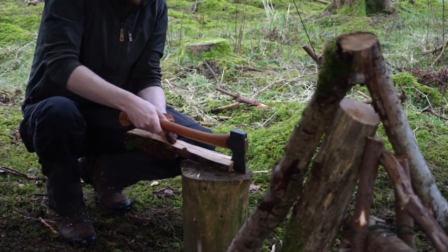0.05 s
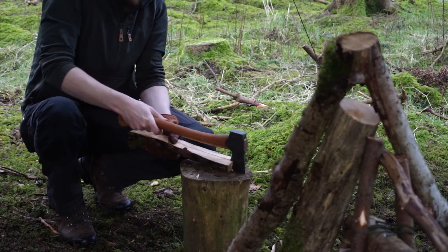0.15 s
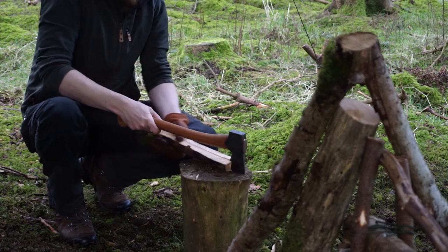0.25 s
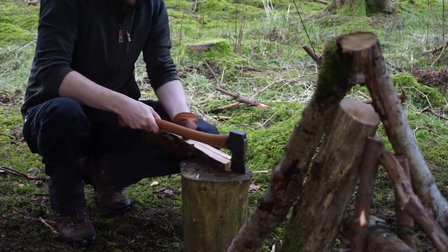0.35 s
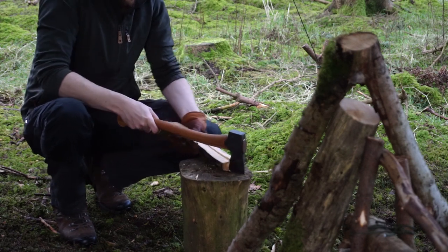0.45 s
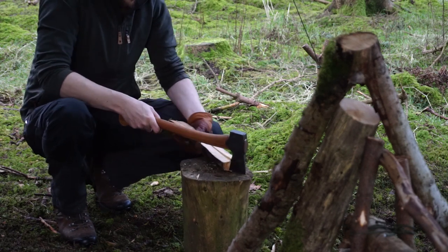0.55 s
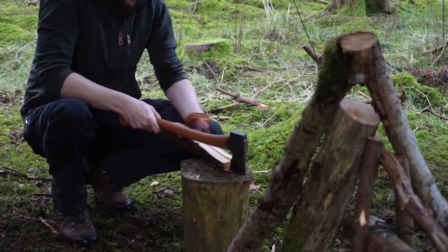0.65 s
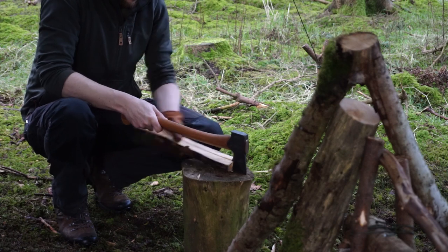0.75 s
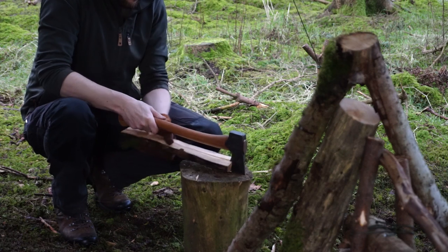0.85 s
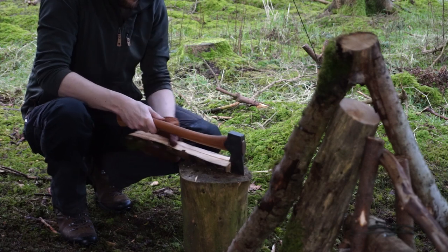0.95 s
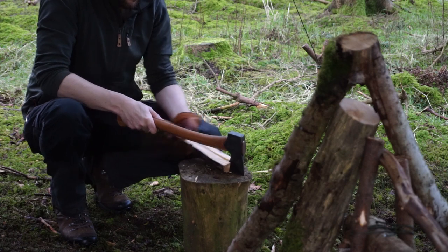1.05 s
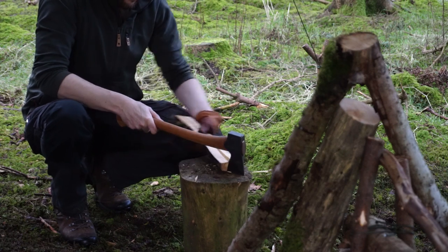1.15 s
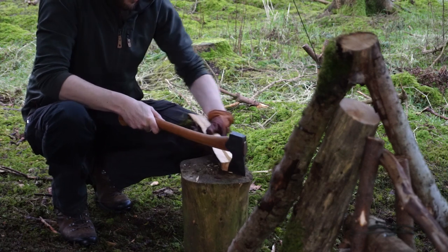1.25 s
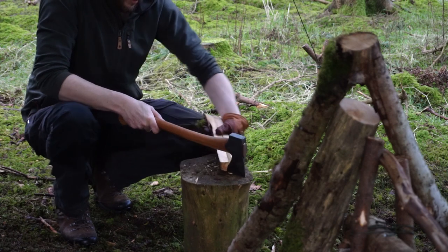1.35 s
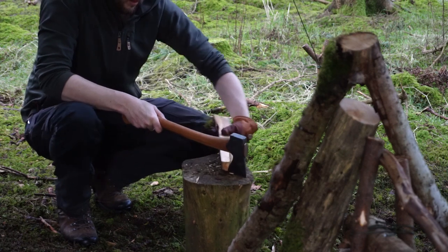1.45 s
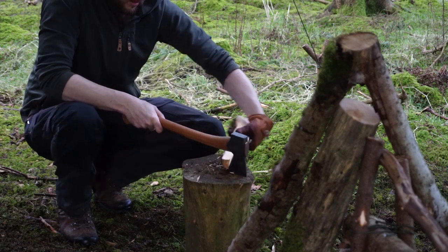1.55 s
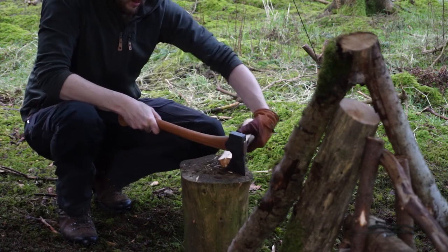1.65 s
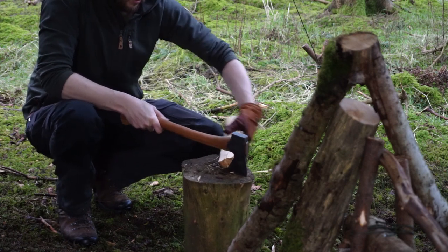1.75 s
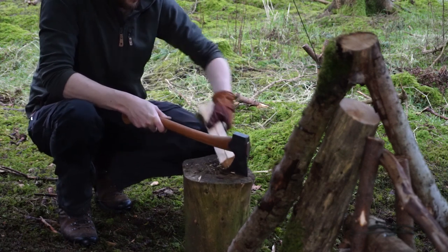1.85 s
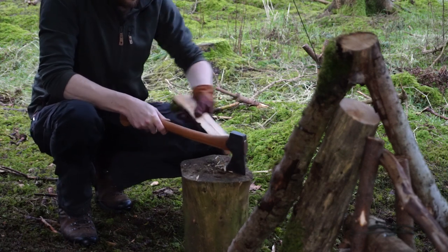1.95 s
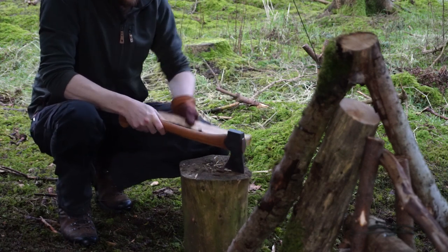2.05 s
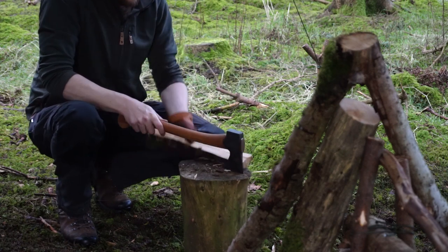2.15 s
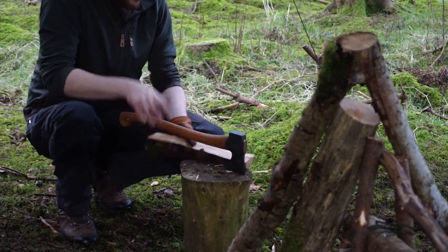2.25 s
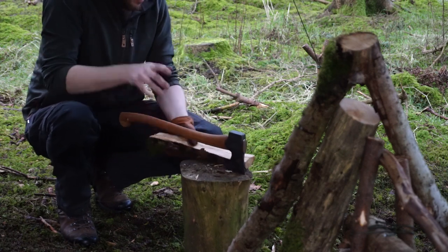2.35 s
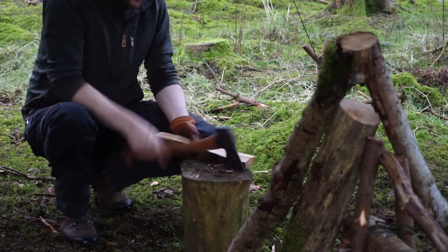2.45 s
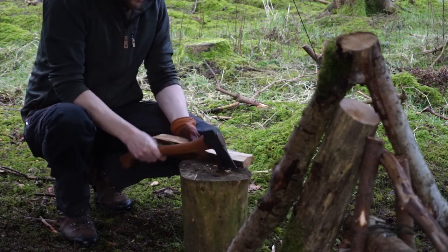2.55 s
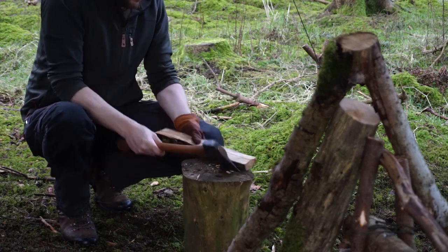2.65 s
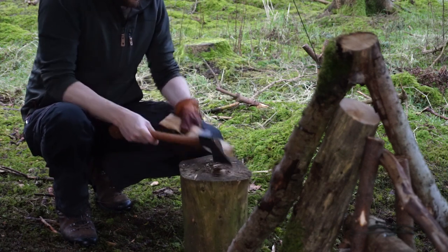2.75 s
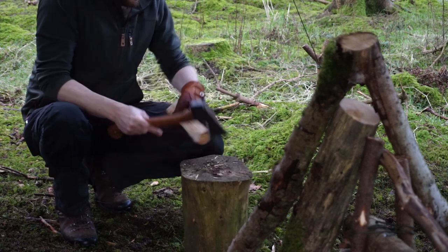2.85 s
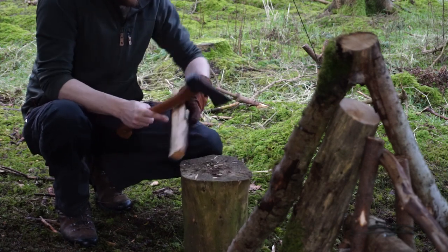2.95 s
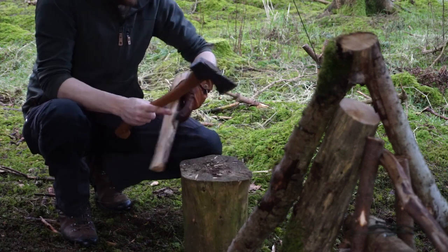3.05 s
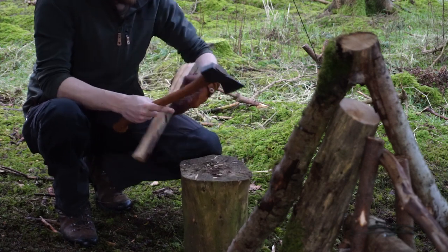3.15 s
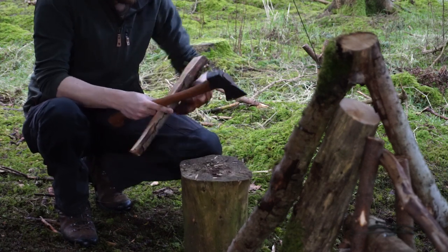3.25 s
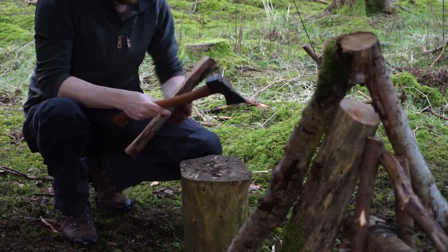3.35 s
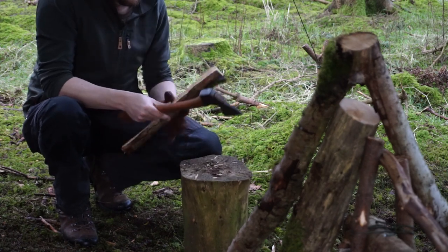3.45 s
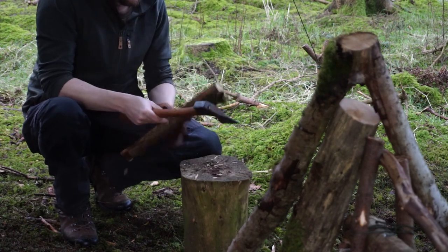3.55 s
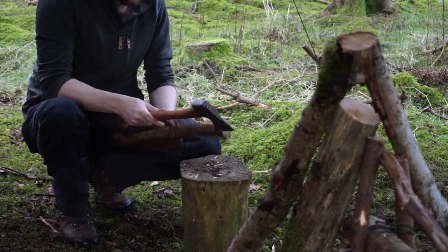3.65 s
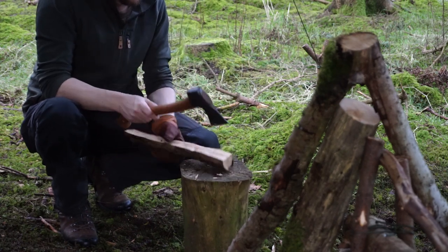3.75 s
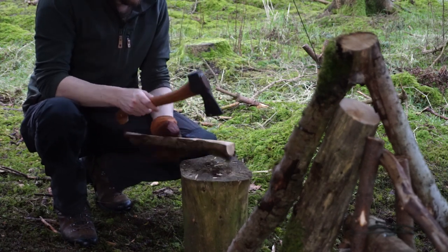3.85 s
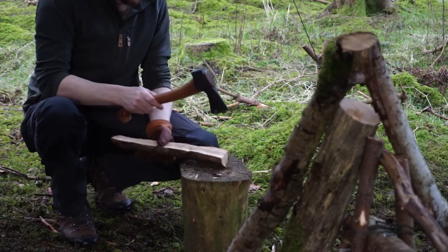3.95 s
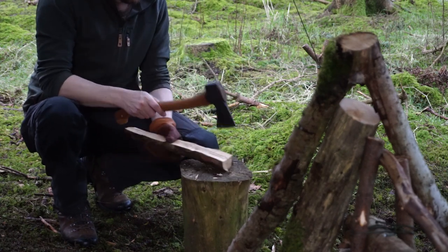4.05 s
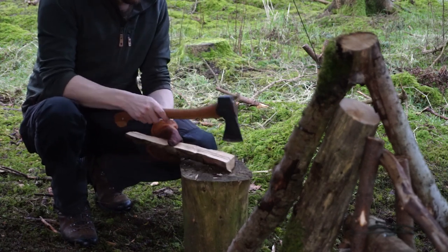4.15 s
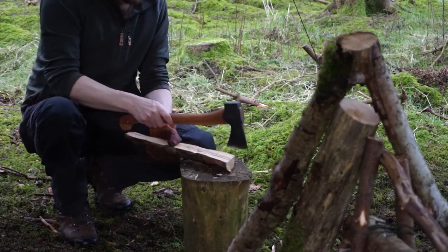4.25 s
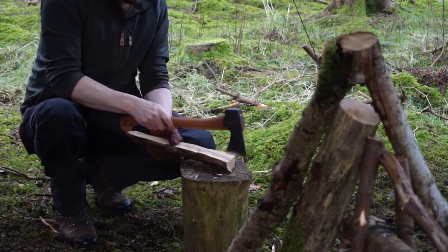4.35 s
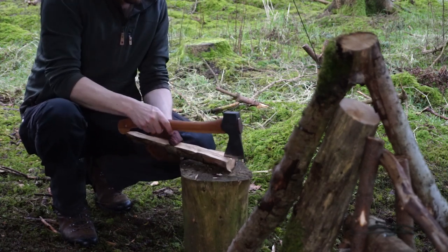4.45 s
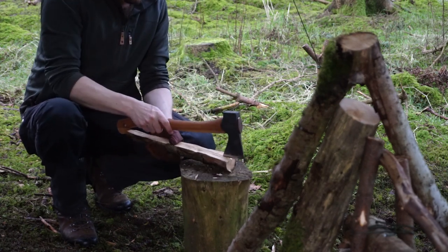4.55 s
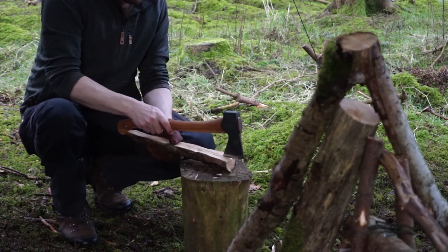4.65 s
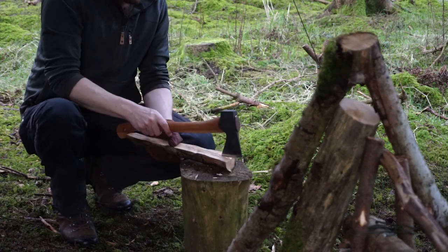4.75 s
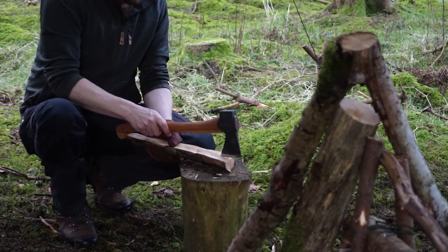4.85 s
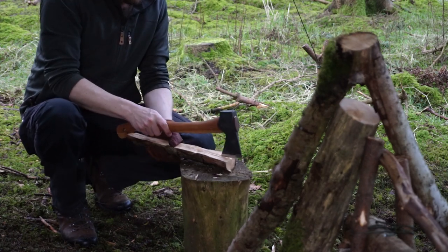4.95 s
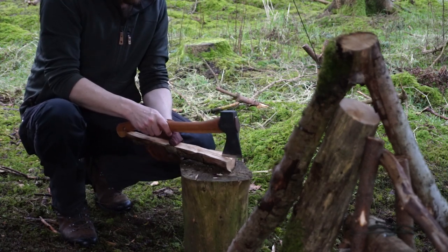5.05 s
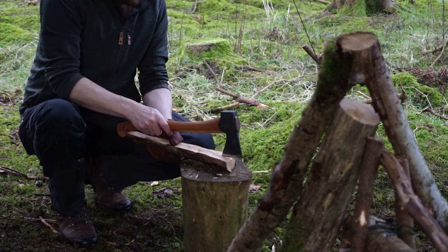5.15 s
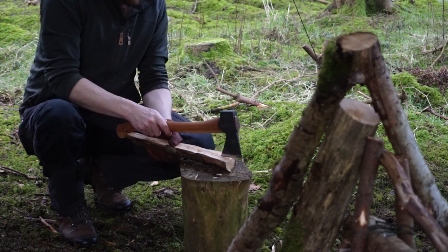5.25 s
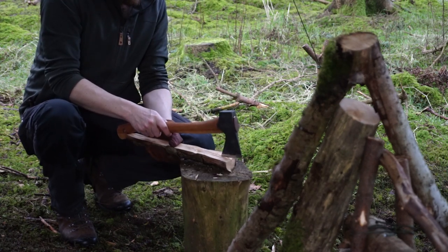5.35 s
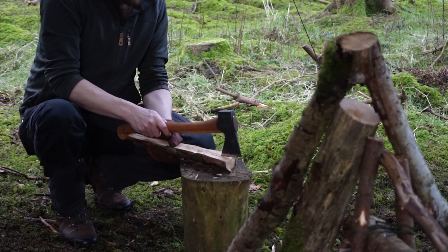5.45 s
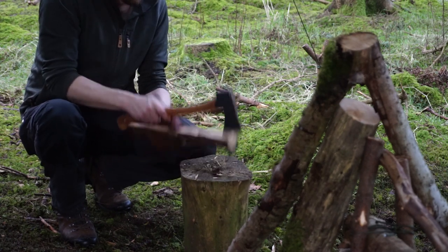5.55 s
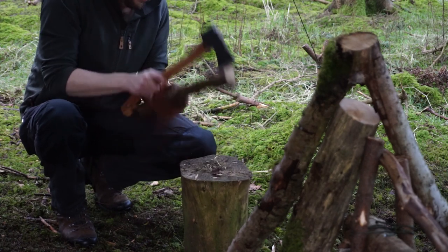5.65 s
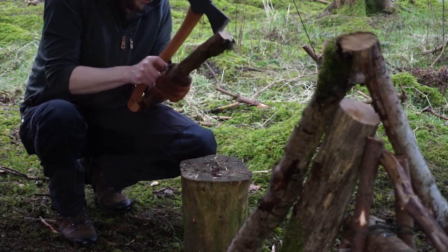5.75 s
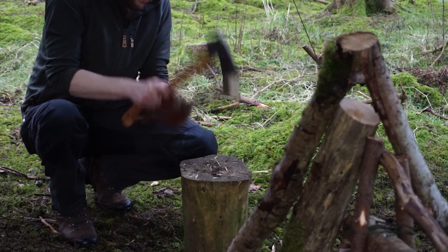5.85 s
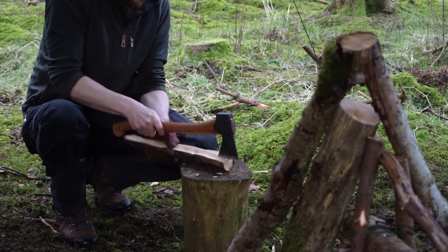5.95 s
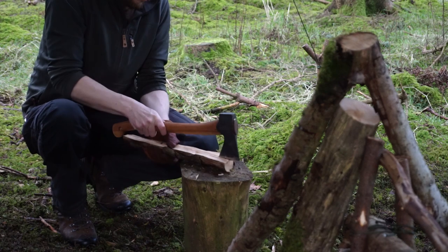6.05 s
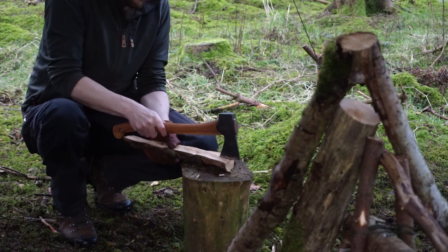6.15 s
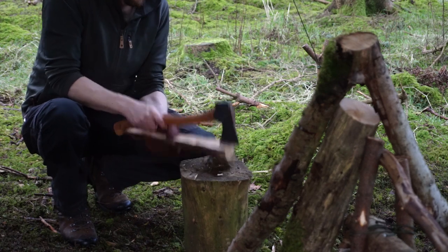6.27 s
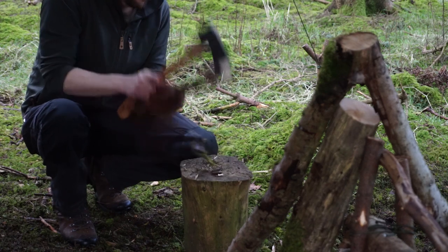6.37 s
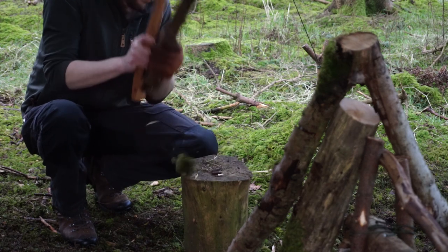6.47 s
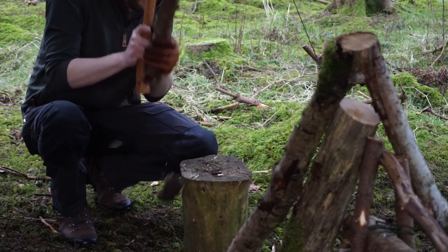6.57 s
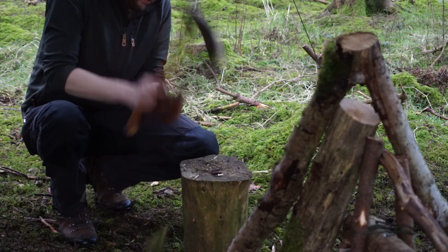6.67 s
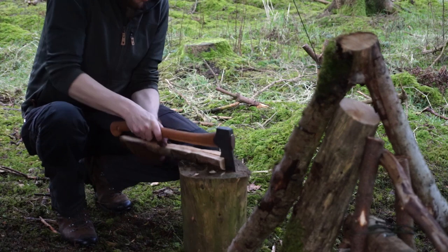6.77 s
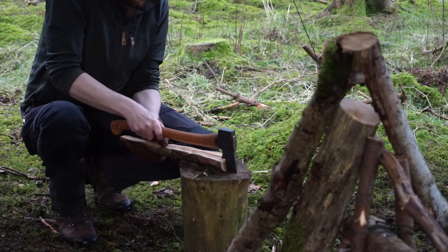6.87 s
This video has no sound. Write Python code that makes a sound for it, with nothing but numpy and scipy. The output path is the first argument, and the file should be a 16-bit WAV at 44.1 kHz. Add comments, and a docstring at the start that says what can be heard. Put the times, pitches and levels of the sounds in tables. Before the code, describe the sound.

Outdoor hatchet work, picked up by a nearby camera with slight hum and hiss. Dry, snapping blows on wood come first, with small fibre crackles and a bird's quick trill fading away. Handling knocks, tiny splinter ticks and cloth rustle fill the middle, with thin sliding bird whistles. Finally two louder, fuller chops crack and thump, their short diffuse echoes dying among the trees.

```python
"""Sharp cracks ring through mossy woodland as a hatchet splits a short billet on a chopping block.
Each blow drives damped modes of wood and hatchet with a push and tearing fibres; noise echoes from the trunks.
Clicks make splinter ticks and a ground thud, grainy noise makes rubbing sleeves, and gliding sines
make small birds. Under them lie a soft wash of shaped noise and the camera's faint hum and hiss."""
import sys
import numpy as np
from scipy import signal
from scipy.fft import rfft, irfft
from scipy.io import wavfile
from scipy.ndimage import uniform_filter1d

SR = 44100
rng = np.random.default_rng(int(sys.argv[2]) if len(sys.argv) > 2 else 0)


def master(y):
    """Save y as 16-bit WAV."""
    cut = np.clip(np.atleast_2d(y).T, -1, 1)
    pcm = np.round(cut * 32767)  # scale
    wavfile.write(sys.argv[1], SR, pcm.astype(np.int16))


N = 304713

# Borders of the registers thud, knock, clack, rap, crack and snap, low to high, in Hz.
REGISTER_EDGES = [175, 420, 880, 2000, 2850, 4200, 15000]


def amp(db):
    """Turns decibels into gain."""
    return 10 ** (np.asarray(db) / 20)


def unit(x):
    """Scales to rms 1."""
    return x / np.sqrt(np.mean(x ** 2) + 1e-20)


def packet(x):
    """Scales to energy 1."""
    return x / np.sqrt(np.sum(x ** 2) + 1e-20)


def add(mix, s, sound):
    """Mixes a sound in at a time in seconds."""
    part = mix[max(round(s * SR), 0):][:len(sound)]
    part += sound[:len(part)]


def band(x, lo, hi, order=2):
    """Causal band-pass between two frequencies in Hz."""
    sos = signal.butter(order, [lo, min(hi, .49 * SR)], "band", fs=SR, output="sos")
    return signal.sosfilt(sos, x)


def coloured(x, points):
    """Gives a noise the spectrum drawn through points (Hz, dB), at rms 1."""
    hz, db = np.transpose(points)
    shape = np.interp(np.log(np.fft.rfftfreq(len(x), 1 / SR) + 1), np.log(hz), db)
    return unit(irfft(rfft(x) * amp(shape), len(x)))


def chopping():
    """Splits, duller knocks and faint cracks, with a slap from one near trunk and the forest's tail."""
    # The billet splits. Each row: start in seconds, knock of the wood in dB, centre of the knock in Hz,
    # crack of the fibres in dB, ring of the hatchet in dB, tearing time in seconds,
    # factor on the wood's pitch, factor on its ringing time, send to the forest echo in dB.
    splits = [(.364, -49, 1700, -31, -48, 0.0024, 0.98, 0.55, -13),
              (0.4995, -21, 930, -28, -21.5, 0.0023, 1.095, 1.24, -17),
              (1.273, -29.5, 1320, -31, -19.5, 0.0024, 0.99, 0.5, -24.5),
              (1.6487, -37.5, 1060, -43, -40.5, 0.0087, 1, 0.82, -38),
              (5.999, -11.5, 824, -28, -44, 0.0038, 1.013, 0.42, -27),
              (6.7925, -38, 1300, -44.5, -47.5, 0.0067, 1.25, 0.78, -22),
              (6.813, -15, 1110, -25, -22.5, 0.003, 1.036, 0.41, -13.5)]
    # Duller knocks: billet and hatchet bumping on the block, and the low thuds within the blows.
    # Each row: start in seconds, knock level in dB, centre of the knock in Hz, factor on the wood's pitch.
    knocks = [(1.657, -41, 328, 1.4), (2.5, -28.5, 947, 0.91), (2.5078, -31, 1050, 0.91),
              (2.511, -24.5, 198, .8), (2.8331, -40, 700, 0.92), (3.768, -24.5, 1136, 1.1),
              (3.8071, -36.5, 740, 0.95), (3.824, -44, 620, 0.98), (4.369, -43, 644, 0.94),
              (4.5041, -44, 1140, 1.47), (6.005, -25.5, 257, 1), (6.318, -30.5, 715, 1),
              (6.817, -17, 820, 0.87)]
    # Short, faint cracks: fibres giving way, and one trunk's slap just after the first loud split.
    # Each row: start in seconds, level of the crack in dB.
    faint_cracks = [(0.3029, -54.5), (0.341, -51.5), (0.347, -47), (0.3958, -45.5), (0.417, -55.5),
                    (0.5315, -51), (1.2312, -69), (1.6291, -65), (1.642, -58)]

    contacts = list(splits)
    for s, db, centre_hz, pitch in knocks:
        bright_db = db - 27.5  # only a little crack and hatchet ring
        contacts.append((s, db, centre_hz, bright_db, bright_db, 0.0046, pitch, 0.7, -16.5))
    for s, db in faint_cracks:
        contacts.append((s, db - 14, 1200, db, db + 11, 0.0012, 1.04, 1, -20))

    near, far = np.zeros(N), np.zeros(N)
    for s, *contact, echo_db in contacts:
        sound = blow(*contact)
        add(near, s, sound)
        add(far, s, amp(echo_db) * sound)

    # slap from the nearest trunk
    slap_delay_s, slap_db = .0428, -22
    add(near, slap_delay_s, amp(slap_db) * band(near, 2700, 4600, order=1))

    # moss swallows the lows and needles the highs, so the upper middle lasts longest
    low = amp(-5) * forest_wash(far, 590, 2000, t60=0.84)
    middle = forest_wash(far, 1900, 2600, t60=0.99) + forest_wash(far, 2850, 3560, t60=0.93)
    high = amp(-9) * forest_wash(far, 3700, 8500, t60=0.4)
    return near + low + middle + high


def blow(knock_db, knock_hz, crack_db, ring_db, tear_s, pitch, sustain):
    """The wood's knock, the fibres' crack and the hatchet's ring add their power in each register."""
    # Modes of block and billet, before the blow retunes and damps them.
    # Each row: frequency in Hz, level in dB within its register, time to fall 60 dB in seconds.
    wood_modes = [(205, -2.5, 0.066), (275, 10, 0.086), (462, 5, 0.022), (614, 17.5, 0.022),
                  (689.5, 10.5, 0.089), (825, 18, 0.0087), (919, 12.5, 0.02), (1147, 11.5, 0.032),
                  (1460, 11, .014), (1645, 9, 0.021), (1905, 7, .022), (2064, 14, 0.025),
                  (2372, 12.5, 0.023), (2594, 11, 0.054)]
    # Modes of the hatchet, the same in every blow.
    # Each row: frequency in Hz, level in dB within its register, time to fall 60 dB in seconds.
    hatchet_modes = [(3120, 7.5, 0.005), (3580, 3.5, 0.0063), (4000, 1, 0.0047), (4600, 16, .0035),
                     (6570, 3, 0.007), (7980, 9.5, 0.0018), (11500, 2, 0.00062)]
    # How tearing fibres spread over the registers: one level per register, low to high, in dB.
    fibre_colour = [-31, -15, -1.5, 3, 3.5, 5]
    # How the hatchet's head spreads over the registers: one level per register, low to high, in dB.
    head_colour = [-45.5, -39, -21, -41, 4, -12.5]
    below_db, above_db = 10, 13  # fall of a knock per octave below and above its centre

    centres = np.sqrt(np.multiply(REGISTER_EDGES[:-1], REGISTER_EDGES[1:]))
    octaves = np.log2(centres / knock_hz)
    knock = amp(knock_db - np.maximum(-below_db * octaves, above_db * octaves))
    fibres = amp(crack_db) * amp(fibre_colour)
    ring = amp(ring_db) * amp(head_colour)
    levels_db = 10 * np.log10(knock ** 2 + fibres ** 2 + ring ** 2)

    # grip and blade retune and damp the wood; the hatchet keeps its own modes
    tuned_wood = [(hz * pitch, db, t60 * sustain) for hz, db, t60 in wood_modes]
    return strike(levels_db, max(tear_s, 1 / SR), tuned_wood + list(hatchet_modes))


def strike(levels_db, tear_s, modes):
    """A push and tearing fibres ring damped modes, levelled by register (dB rms over 10 ms)."""
    t = np.arange(SR // 6) / SR

    # block, logs and ground close by scatter the sound for a few hundredths of a second
    surroundings = amp(-11) * dying_clicks(t, 0.013, spread_db=11)
    surroundings[0] += 1  # direct sound
    surroundings[round(.0063 * SR)] += amp(-15)  # ground reflection

    # a rounded push carries the lows, the first fibres snap within a millisecond,
    # and the rest tear after them
    push_s, snap_s = .00009, 0.00071
    push = .5 * packet(t * np.exp(-t / push_s))
    snap = amp(-1) * dying_clicks(t, snap_s)
    # a longer tear carries more energy
    tearing = amp(-2) * np.sqrt(tear_s / 0.0022) * dying_clicks(t, tear_s)
    force = signal.fftconvolve(push + snap + tearing, surroundings)[:len(t)]

    out = np.zeros(len(t))
    for level_db, lo, hi in zip(levels_db, REGISTER_EDGES[:-1], REGISTER_EDGES[1:]):
        ring = np.zeros(len(t))
        for k, (hz, mode_db, t60) in enumerate(modes):
            if lo <= hz < hi:
                # neighbouring modes start with opposite signs
                ring += (-1) ** k * amp(mode_db - 60 * t / t60) * np.sin(2 * np.pi * hz * t)
        driven = signal.fftconvolve(force, ring)[:len(t)]
        out += amp(level_db) * packet(band(driven, lo, hi, order=3))
    return out * np.sqrt(SR / 100)  # energy 1 becomes rms 1 over 10 ms


def dying_clicks(t, life, spread_db=3, rise_s=0.00087):
    """A swarm of unequal clicks builds up quickly and fades with the time constant life (s)."""
    sizes = rng.standard_normal(len(t)) * amp(spread_db * rng.standard_normal(len(t)))
    return packet(sizes * (1 - np.exp(-t / rise_s)) * np.exp(-t / life))


def forest_wash(x, lo, hi, t60, build_s=0.005, flutter_db=0.5):
    """Countless trunks blur a crack into noise that follows its power in one band, then dies away."""
    t = np.arange(SR) / SR
    decay = packet((1 - np.exp(-t / build_s)) * amp(-60 * t / t60)) ** 2
    power = abs(signal.fftconvolve(band(x, lo, hi) ** 2, decay)[:N])
    flutter = amp(flutter_db * unit(uniform_filter1d(rng.standard_normal(N), size=400)))
    noise = unit(band(rng.standard_normal(N), lo, hi, order=3))
    return np.sqrt(power) * flutter * noise


def taps():
    """Splinters tick as the billet turns in the hand; the ground thuds dully after the heaviest blow."""
    # Splinter ticks. Each row: start in seconds, pitch in Hz, level in dB.
    ticks = [(2.2679, 3150, -53), (3.196, 2670, -54), (3.2965, 2760, -49.5), (3.519, 5900, -51.5),
             (3.6062, 4300, -47), (3.6252, 6960, -49.5)]
    # Ground thud. Each row: start in seconds, pitch in Hz, level in dB, dying time in seconds.
    thuds = [(6.07, 80, -61, 0.032)]
    tick_s = 0.0038  # dying time of a tick

    out = np.zeros(N)
    for s, hz, db in ticks:
        add(out, s, tap(hz, db, tick_s))
    for s, hz, db, life in thuds:
        add(out, s, tap(hz, db, life))
    return out


def tap(hz, db, life, octaves=0.26):
    """A short burst of clicks in one resonance, octaves to each side; dB rms over 10 ms."""
    burst = dying_clicks(np.arange(SR // 4) / SR, life)
    resonance = packet(band(burst, hz * 2 ** -octaves, hz * 2 ** octaves))
    return amp(db) * resonance * np.sqrt(SR / 100)


def rubbing(grain_db=3):
    """Sleeve, glove and bark rub: grainy friction noise swells and fades with each move of the arms."""
    # Strokes. Each row: middle in seconds, length in seconds (two standard deviations of the swell),
    # level at the middle in dB.
    rubs = [(1.077, 0.076, -54.5), (1.311, 0.18, -52), (1.637, 0.09, -51.5), (2.591, 0.066, -57.5),
            (2.837, 0.062, -55), (3.31, 0.05, -52), (3.59, 0.56, -54.5), (6.46, 0.026, -53.5),
            (6.606, 0.077, -52)]
    # Spectrum of the friction. Each row: frequency in Hz, relative level in dB.
    rub_colour = [(150, -7.5), (500, 9), (1000, 11), (1800, 5.5), (3200, 10.5), (6000, 1.5), (10000, -4.5),
                  (16000, -55)]

    t = np.arange(N) / SR
    stroke = sum(amp(db) * np.exp(-2 * ((t - s) / length) ** 2) for s, length, db in rubs)
    grains = amp(grain_db * unit(uniform_filter1d(rng.standard_normal(N), size=90)))
    return stroke * coloured(grains * rng.standard_normal(N), rub_colour)


def birds():
    """Gliding whistles sing single notes over a faint chatter from deep among the trees."""
    # The nearer birds' slurs and one low coo. Each row: start in seconds, length in seconds,
    # first pitch in Hz, last pitch in Hz, level in dB before the birds' common gain.
    slurs = [(0, .24, 381, 374.4, -56.5), (1.686, 0.16, 2267, 2420, -64), (2.754, 0.059, 3160, 3700, -57.5),
             (3.078, 0.07, 4230, 4430, -58.5), (3.11, .3, 3304, 3130, -64.5),
             (3.407, .26, 1540, 1630, -64.5), (3.45, 0.12, 3300, 3130, -57.5),
             (3.635, 0.093, 3290, 3134, -56), (3.889, .1, 3880, 2990, -53.5),
             (4.222, 0.1, 4280, 4350, -61.5), (4.257, .045, 4920, 5650, -62),
             (4.26, .09, 3446, 4260, -53.5), (4.347, 0.071, 4200, 3370, -51),
             (4.537, 0.022, 6750, 5500, -58), (4.559, 0.031, 5580, 5450, -56),
             (4.6, 0.021, 4060, 2830, -51.5), (4.619, .028, 2810, 3770, -54),
             (4.677, 0.16, 2400, 2290, -63.5), (4.954, 0.17, 2140, 1866, -68.5),
             (5.114, 0.035, 3320, 3710, -58.5), (5.276, 0.098, 3060, 2872, -46),
             (5.372, 0.063, 6000, 4920, -67.5), (5.452, 0.02, 3370, 4150, -57),
             (5.456, 0.079, 2930, 2820, -47), (5.459, .04, 2680, 2340, -57), (5.552, .055, 4250, 4470, -63),
             (5.618, 0.076, 2550, 2090, -60), (5.649, .022, 3350, 4050, -57), (5.733, .03, 3440, 4220, -62),
             (5.798, 0.022, 3240, 3670, -56), (6.1, .04, 2010, 2430, -70), (6.244, .025, 3050, 3630, -63)]
    # Chatter of farther birds over time. Each row: time in seconds, level of one chirp in dB
    # before the gains of chatter and birds.
    chatter_levels = [(0, -58), (2.8, -73), (3.7, -61), (4.05, -52), (4.9, -66), (5.8, -56), (6.7, -61)]
    chirp_count, chirp_s, chatter_hz = 130, .03, 3200  # length and pitch at the middle of their spread
    spread_octaves, slur_octaves = 0.3, 0.306

    song, chatter = np.zeros(N), np.zeros(N)
    for s, *shape in slurs:
        add(song, s, note(*shape))

    for k, (when, span, height, way) in enumerate(rng.uniform(-1, 1, (chirp_count, 4))):
        s = (k + .5 + when / 2) * N / SR / chirp_count
        slur = slur_octaves * np.sign(way) * np.array([-.5, .5])  # upward or downward
        pitches = chatter_hz * 2 ** (spread_octaves * height + slur)
        db = np.interp(s, *np.transpose(chatter_levels))
        add(chatter, s, note(chirp_s * 2 ** span, *pitches, db))

    # the farther off a bird is, the weaker its direct sound against the echo
    direct = song + amp(-9) * chatter
    echo = forest(amp(-2.5) * (song + chatter), t60=1.0, build_s=0.0034)
    return amp(-1) * (direct + echo)


def trill(fade_db_per_s=-4):
    """One bird repeats a syllable of gliding whistles, wrapped in its own forest echo."""
    # One syllable. Each row: start within the syllable in seconds, length in seconds,
    # first pitch in Hz, last pitch in Hz, level in dB before the trill's fade.
    syllable = [(0, .028, 3333, 2403, -48.5), (0.031, 0.0094, 2150, 2540, -51.5)]
    # the trill is already under way at the start
    first_s, step_s, count = -.338, .0745, 14

    # a second of lead-in lets the echo build up
    song = np.zeros(SR + N)
    for k in range(count):
        start = first_s + k * step_s
        for s, *shape in syllable:
            add(song, 1 + start + s, amp(fade_db_per_s * start) * note(*shape))
    echo = amp(-1.5) * forest(song, t60=1.0, build_s=.006)
    return (song + echo)[SR:]


def note(length, first_hz, last_hz, db, waver=0.008, flutter_db=2.5):
    """A sine whistle slurs between two pitches, its pitch wavering and its level fluttering slightly."""
    u = np.linspace(0, 1, max(round(length * SR), 2))
    slow_noise = uniform_filter1d(rng.standard_normal((2, SR // 2)), size=220, axis=1)
    bend, flutter = unit(slow_noise)[:, :len(u)]
    # the slur lingers at its low end and sweeps at its high end
    height = (u if last_hz > first_hz else 1 - u) ** 1.8
    glide_hz = min(first_hz, last_hz) + abs(last_hz - first_hz) * height
    whistle = np.sin(2 * np.pi * np.cumsum(glide_hz * (1 + waver * bend)) / SR)
    return amp(db) * unit(whistle * amp(flutter_db * flutter) * signal.windows.tukey(len(u), .3))


def forest(x, t60, build_s):
    """Diffuse echo from many trunks: a noise tail swells briefly, then dies away."""
    t = np.arange(SR) / SR
    tail = rng.standard_normal(SR) * (1 - np.exp(-t / build_s)) * amp(-60 * t / t60)
    return signal.fftconvolve(x, packet(tail))[:len(x)]


def air(db=-57, swell_db=2.0, apart_db=-17):
    """The woodland's soft, distant wash: slowly swelling noise, nearly the same in both channels."""
    # Spectrum of the wash. Each row: frequency in Hz, relative level in dB.
    air_colour = [(20, -28.5), (50, -38), (100, -23), (160, -16.5), (250, -15), (320, -8), (430, -7),
                  (800, -8.5), (1250, -20.5), (2000, -21), (3000, -31), (4000, -24.5), (8000, -32.5),
                  (16000, -70)]

    swell = unit(np.interp(np.arange(N), np.linspace(0, N, num=30), rng.standard_normal(size=30)))
    shared, left, right = (coloured(noise, air_colour) for noise in rng.standard_normal((3, N)))
    return amp(db + swell_db * swell) * (shared + amp(apart_db) * np.array([left, right]))


def scene():
    """Chopping, taps, birds and rubbing sit in the middle of the woodland wash."""
    return chopping() + taps() + birds() + trill() + rubbing() + air()


def record(dry, wander_s=.00008, throb_s=0.00969, ceiling=.95, cutoff_hz=16200):
    """The camera adds its hum and hiss, rounds off the sharpest peaks and limits the band."""
    # Steady hum of the camera. Each row: frequency in Hz, level in dB rms.
    hum_lines = [(150, -75), (187.5, -76), (212.5, -62.5), (237.5, -59), (262.5, -71), (425, -70)]

    t = np.arange(N) / SR
    # the hum's lines share one clock, so they beat together as a quick, even throb
    clock = t - throb_s + wander_s * unit(uniform_filter1d(rng.standard_normal(N), size=16000))
    hum = sum(amp(db) * unit(np.cos(2 * np.pi * hz * clock)) for hz, db in hum_lines)

    shared_hiss = amp(-67) * rng.standard_normal(N)
    own_hiss = amp(-59.0) * rng.standard_normal((2, N))  # one for each channel
    out = dry + hum + band(shared_hiss + own_hiss, 140, SR / 2, order=1)

    # no swing passes the input's ceiling
    out = out / (1 + (out / ceiling) ** 8) ** (1 / 8)
    lowpass = signal.firwin(511, cutoff_hz, window=("kaiser", 9), fs=SR)
    return signal.oaconvolve(out, lowpass[None], "same")


dry = scene()
out = record(dry)
master(out)
```